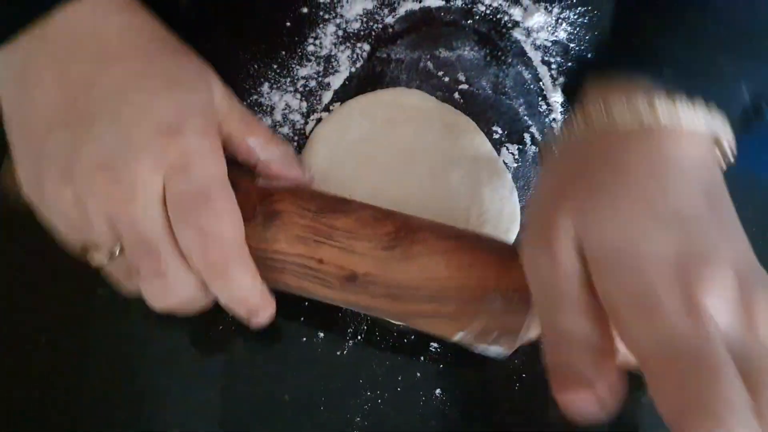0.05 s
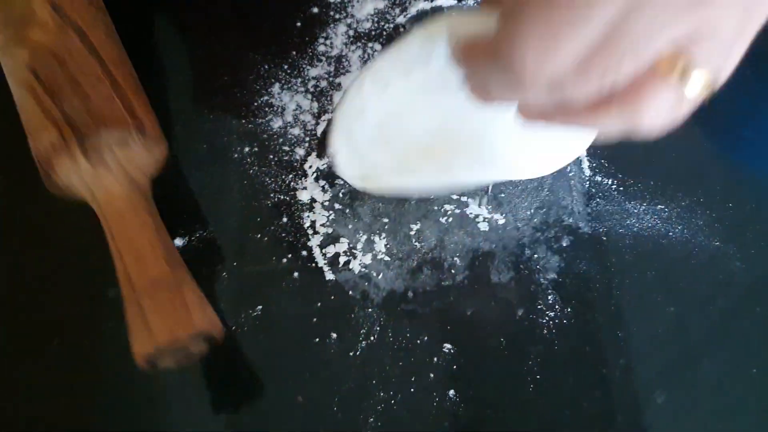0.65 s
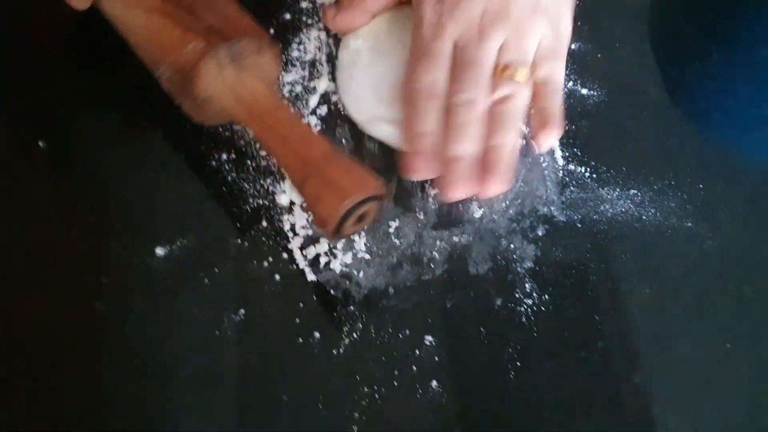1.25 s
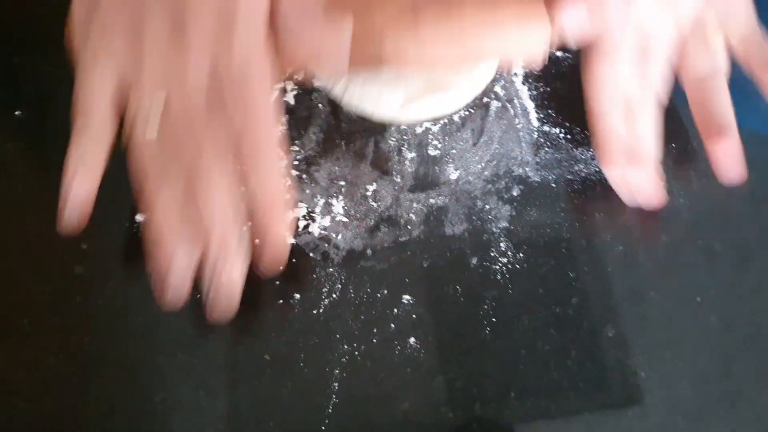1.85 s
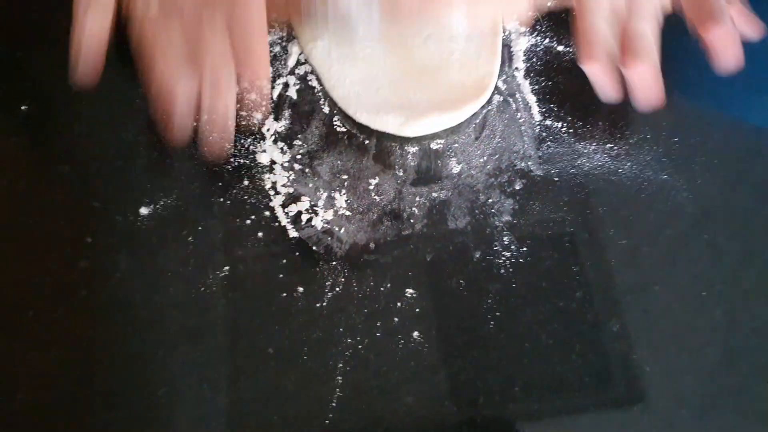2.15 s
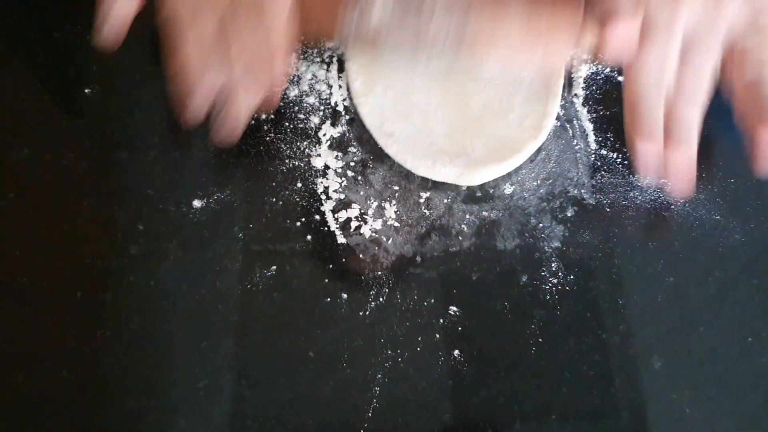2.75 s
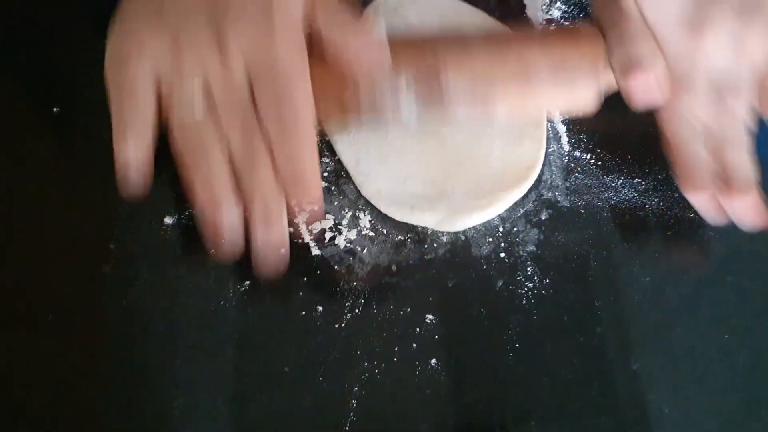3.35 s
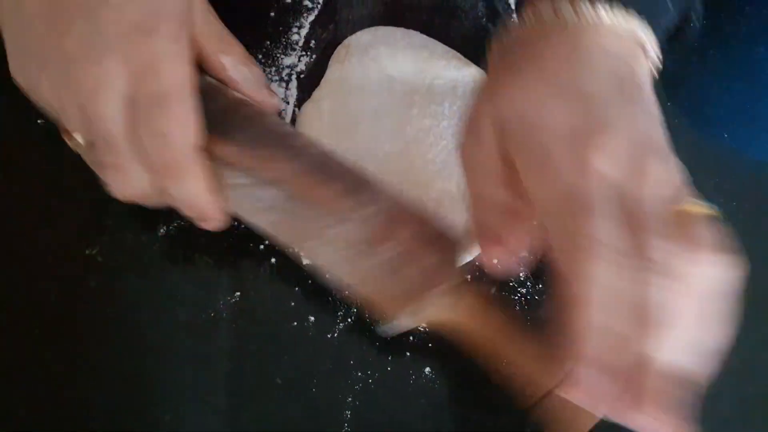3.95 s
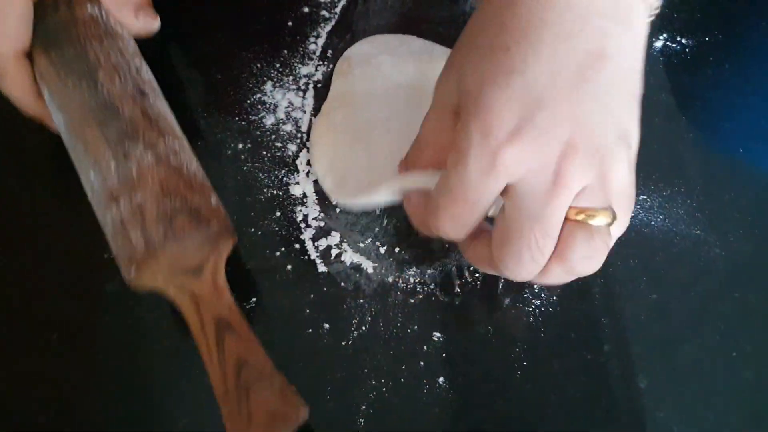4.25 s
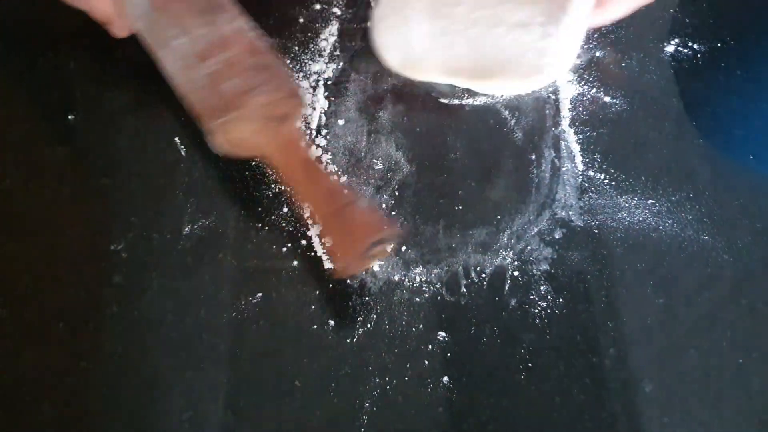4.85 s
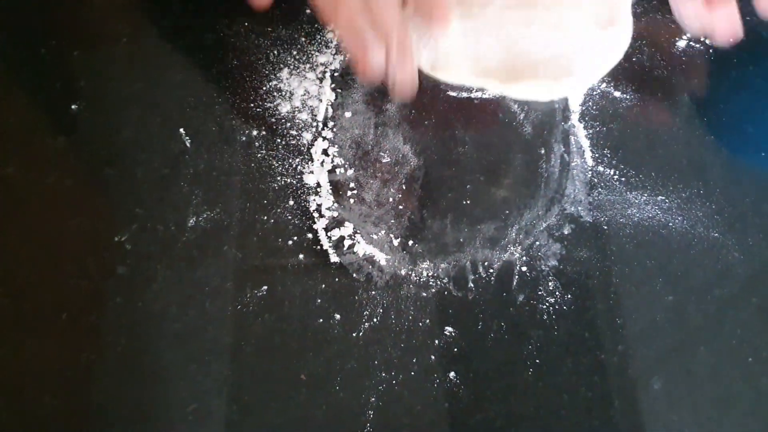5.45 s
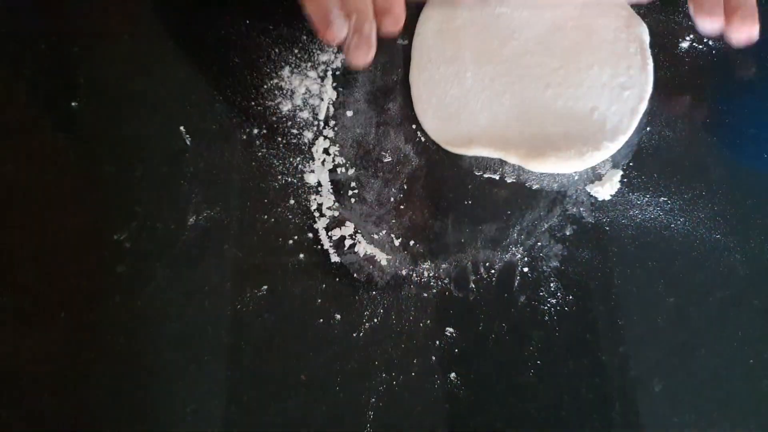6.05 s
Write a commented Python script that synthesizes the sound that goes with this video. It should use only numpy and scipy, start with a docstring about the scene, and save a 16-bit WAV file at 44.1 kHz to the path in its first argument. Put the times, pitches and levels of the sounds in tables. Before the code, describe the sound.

Dough is rolled and flipped on a stone counter, with floury swishes, wooden clacks and dull thumps in a humming kitchen.

```python
"""A wooden pin rolls out dough on a floured stone countertop, heard close up in a humming kitchen.
Flour grains shear and hiss under palms and pin, and the wood gives each pass a hollow colour.
The pin knocks and skids, jewellery clicks, fingertips pat, and soft pushes make the counter thump.
Twice the dough tears loose from the stone and flaps over; once it lands with a slap."""
import sys
import numpy as np
from scipy import signal
from scipy.fft import rfft, irfft, next_fast_len
from scipy.io import wavfile
from scipy.ndimage import uniform_filter1d, map_coordinates

SR = 44100
rng = np.random.default_rng(int(sys.argv[2]) if len(sys.argv) > 2 else 0)


def transcribe(signal):
    """Save signal, clipped to [-1, 1], as a 16-bit WAV file at the path in sys.argv[1]."""
    frames = np.atleast_2d(signal).T
    limited = np.clip(frames, -1, 1)
    pcm = np.round(limited * 32767).astype(np.int16)
    wavfile.write(sys.argv[1], SR, pcm)


N = 273861
TIME = np.arange(N) / SR
AFTER = TIME[:SR]  # seconds since a blow

# Mains and motor hum. Each row: pitch in Hz, relative level in dB.
HUM_TONES = [(24.7, -57), (40.4, -45.5), (52, -50), (71.5, -43.5), (100.05, -33.5), (200.1, -52),
             (221.4, -49), (242.6, -52)]
# The kitchen's reverb. Each row: frequency in Hz, time to fall 60 dB in seconds.
ROOM_DECAY = [(150, 0.16), (1300, 0.58), (5000, 0.39), (14000, 0.075)]
# Stereo width of the noises. Each row: frequency in Hz, left-right likeness from 0 to 1.
STEREO_LIKENESS = [(100, 0.99), (250, 0.86), (500, 0.65), (1000, 0.25), (2000, 0), (12000, 0)]
# Tone of the microphone ports. Each row: frequency in Hz, right side over left in dB.
PORT_BALANCE = [(100, -1.64), (300, -2.5), (1100, -3), (2000, -1.5), (3200, -1), (4800, -1), (6500, -1),
                (8000, -0.5), (9300, 14.5), (11000, 2), (13000, 4.5), (15500, -5)]

# Noise colours. Each row: frequency in Hz, relative spectral level in dB.
AIR_TONE = [(15, -31), (45, 3), (100, -0.5), (150, -6.5), (200, -5.5), (300, -12), (500, -23), (900, -31.5),
            (2000, -47), (4000, -45.5), (7000, -73.5), (15000, -95)]  # dull room air
MIC_TONE = [(500, 6), (1200, -5), (2500, 4), (4200, -5), (7000, -5.5), (10000, -3.5), (12000, -8),
            (15500, -13)]  # steady microphone hiss
CRACK_TONE = [(300, -16), (1200, -3), (2600, -11.5), (4500, -1.5), (10000, -1), (15500, -9)]  # metal on a hard surface
PAT_TONE = [(200, -18), (400, 5), (650, 8), (900, -26), (2000, -49), (5000, -60)]  # fingertip on dough
SMACK_TONE = [(200, 11), (600, -3.5), (850, -0.5), (1080, 8), (1350, -7.5), (1600, 0.5), (2400, -18),
              (4000, -16.5), (12000, -13.5)]  # flat impact of a slap
PUFF_TONE = [(500, -1.5), (2200, -7), (3600, 2), (5500, -10), (8000, -14.5), (10000, -8), (13000, -14),
             (15500, -25)]  # escaping air and flour
FLAP_TONE = [(25, 9), (43, 3.5), (72, 7), (95, 8.5), (125, 1), (165, -2.5), (190, 8), (250, -9), (330, -9),
             (500, -42), (1000, -58)]  # swinging dough
TEAR_TONE = [(150, -7.5), (320, 5.5), (400, -6), (450, 5), (520, -11), (660, -2.5), (900, -15),
             (1500, -20.5), (1900, -29.5), (2800, -31), (5000, -48.5)]  # dough leaving the stone
SKID_TONE = [(1200, -36), (2000, -3), (2350, -2.5), (2900, -7), (4000, -12), (7000, -18), (12000, -25)]  # slipping wood
FLOUR_TONE = [(2500, -39), (5000, -3.5), (7000, -4), (9500, 0), (12000, -1.5), (15500, -9)]  # shearing grains
SKIN_TONE = [(500, 1.5), (1500, -16), (2600, -5.5), (3300, -4), (4200, 0.5), (5200, -6), (6400, -3),
             (8000, -17), (12000, -35)]  # rasping palms
WOOD_TONE = [(250, -27), (600, 4.5), (850, -2.5), (1220, 4), (1550, -2), (1800, 2.5), (2080, 0),
             (2500, -16.5), (3250, -12.5), (3600, -29), (4250, -2.5), (4800, -36.5), (7000, -41)]  # hollow body of the pin

# Resonances. Each row: pitch in Hz, relative level in dB, nominal time to fall 60 dB in seconds.
COUNTER_MODES = [(57.5, -2, 0.35), (70.5, 2, 0.44), (124.5, -4.5, 0.23), (155, 7.5, 0.051),
                 (182.8, -5.5, 0.27), (330, -18.5, 0.29), (382.5, -12, 0.33)]  # counter and cabinet
PIN_MODES = [(740, -11, 0.012), (1000, -1.5, 0.0096), (1113, -7, 0.013), (1265, 4, 0.018), (1423, 1, 0.019),
             (1530, -14.5, 0.022), (1634, -1, 0.013), (1796, -6.5, 0.022), (2130, -7, 0.015),
             (4460, -24, 0.036)]  # rolling pin

# Dough, hands and pin come down on the counter.
# Each row: start in seconds, relative level in dB, push length in seconds, ring-time multiplier.
COUNTER_THUMPS = [(0.696, -17.5, 0.0021, 0.2), (0.751, -24.5, 0.0056, 0.93), (1.637, -17.5, 0.0085, 1.71),
                  (2.553, -24, 0.00073, .35), (4.812, -35, 0.0041, 0.91), (5.345, -18, 0.011, 1.2)]
# Ring and bracelet. Each row: start in seconds, relative level in dB, brightness in dB per octave.
JEWELLERY_CLICKS = [(0.168, -51, -3.5), (2.5006, -23, -3), (2.542, -34.5, -4), (3.122, -34.5, 7),
                    (3.127, -45, 3), (3.398, -38, 0), (4.052, -49, -3.5), (4.194, -50, -4.5)]
# Fingertips pat and grab the dough. Each row: start in seconds, relative level in dB.
FINGER_PATS = [(0.531, -43), (0.699, -53), (1.68, -36.5), (2.553, -39), (4.023, -46), (4.056, -45.5),
               (4.288, -38)]
# Soft, floury slaps. Each row: start in seconds, then relative levels of smack and puff in dB.
SOFT_SLAPS = [(1.631, -34.5, -51.5), (4.81, -30.5, -36), (5.337, -34, -49.5)]
# The dough is tugged off the stone and swung over.
# Each row: start and length of the hold in seconds, then relative levels of flap and tear in dB.
DOUGH_TUGS = [(0.537, 0.03, -43, -45), (0.701, 0.017, -32.5, -41.5), (0.731, 0.041, -29, -37),
              (0.812, 0.03, -34, -48.5), (0.904, 0.072, -44.5, -56), (4.042, .02, -53, -63),
              (4.205, 0.076, -36, -51.5), (4.294, 0.062, -44, -42), (4.39, 0.067, -64, -54.5)]
# The pin skids as it lifts off: start and length of the hold in seconds, then level in dB.
PIN_SKID = (3.908, 0.0073, -46.5)
# The pin hits the stone.
# Each row: start in seconds, relative level in dB, ring in dB (lower when hands damp the wood).
PIN_KNOCKS = [(2.168, -15, 0.5), (2.192, -33, -8), (2.774, -29, -7), (2.802, -28.5, -15), (3.39, -21, 0),
              (3.398, -22.5, -4), (5.938, -24, -11), (6.0076, -22.5, -8)]
# A hand or the dough brushes over the flour.
# Each row: start and length of the hold in seconds, then relative levels of hiss and rasp in dB.
FLOUR_BRUSHES = [(.08, 0.099, -67, -66.5), (0.34, .08, -66.5, -69), (0.548, 0.057, -58.5, -60.5),
                 (0.854, 0.063, -52.5, -53), (1.161, 0.069, -51.5, -50.5), (1.288, 0.06, -55.5, -50),
                 (1.602, .01, -61, -73), (4.108, 0.012, -56, -69), (4.172, 0.03, -66, -66),
                 (4.385, .055, -63, -75), (4.482, 0.0063, -62.5, -59), (4.735, 0.021, -66, -88),
                 (4.94, 0.016, -60.5, -61), (5.244, 0.048, -68.5, -90)]
# The pin rolls out or back. Each row: start and length of the hold in seconds, relative levels
# of flour hiss, palm rasp and hollow wood in dB, then the swell along the pass in dB.
PIN_PASSES = [(0.0, 0.0082, -57.5, -53.5, -56.5, 2.5), (1.702, 0.21, -52.5, -54, -56.5, 1.5),
              (2.142, 0.093, -51.5, -52, -55, 2.5), (2.333, 0.19, -53, -51, -52, 3),
              (2.716, 0.034, -56, -62, -65, -6), (2.794, 0.035, -48, -49, -60, 0),
              (2.932, .17, -53.5, -54, -55.5, 4), (3.322, 0.091, -52, -54, -57.5, 7.5),
              (3.491, 0.21, -55, -53, -53.5, -1), (3.738, 0.16, -59, -57.5, -62, 0),
              (5.373, 0.13, -56, -62, -53.5, -1.5), (5.499, 0.21, -51.5, -51, -54, -3),
              (5.915, 0.095, -51, -53, -55.5, 8), (6.161, 0.058, -50.5, -54, -54, 0)]


def amp(db):
    """Decibels to gain."""
    return 10 ** (np.asarray(db) / 20)


def unit(x):
    """Scale to rms 1."""
    return x / np.sqrt(np.mean(x ** 2) + 1e-20)


def along(points, hz):
    """Read (Hz, value) points on a log axis."""
    freqs, values = np.transpose(points)
    return np.interp(np.log(hz + 1), np.log(freqs + 1), values)


def wobble(rate):
    """A smooth random curve, rate knots a second."""
    return map_coordinates(rng.standard_normal(int(N * rate / SR) + 4), [TIME * rate])


def filtered(x, response):
    """Equalise x with a gain given as a function of Hz."""
    size = next_fast_len(x.shape[-1] + 8192)
    gain = response(np.fft.rfftfreq(size, 1 / SR))
    return irfft(rfft(x, size) * gain, size)[..., :x.shape[-1]]


def noise(tone, grain_db=0, size=N):
    """Coloured stereo noise of rms 1; grain_db makes it gritty by varying its tiny impulses."""
    def mid_side_gains(hz):
        width = np.arccos(np.clip(along(STEREO_LIKENESS, hz), -1, 1)) / 2
        return amp(along(tone, hz)) * [np.cos(width), np.sin(width)]
    impulses = rng.standard_normal((2, size)) * amp(grain_db * rng.standard_normal(size))
    mid, side = filtered(impulses, mid_side_gains)
    return unit(np.array([mid + side, mid - side]))


def drift(x, depth_db):
    """Moving hands shade and mirror the sound, so soft peaks and dips wander through its spectrum."""
    spectra = signal.stft(x, nperseg=256)[2]
    shading = rng.standard_normal(spectra.shape)
    for _ in range(2):
        shading = uniform_filter1d(shading, size=3, axis=1)  # across frequency
        shading = uniform_filter1d(shading, size=70, axis=2)  # across time
    shaded = spectra * amp(depth_db * unit(shading))
    return unit(signal.istft(shaded, nperseg=256)[1][:, :N])


def fade(t60, attack):
    """Envelope of a blow: quick rise, exponential fall, both set in seconds."""
    return np.exp(-np.log(1000) * AFTER / t60) * (1 - np.exp(-AFTER / attack))


def gesture(start, length, rise_db_per_s, fall_db_per_s, swell_db=0):
    """Envelope of a movement: it rises until start, holds or swells for its length, then dies away."""
    early, late = np.maximum(start - TIME, 0), np.maximum(TIME - start - length, 0)
    progress = np.clip((TIME - start) / length, 0, 1)
    return amp(swell_db * (progress - .5) - rise_db_per_s * early - fall_db_per_s * late)


def add(track, start, sound):
    """Mix a one-second sound into the track at start seconds."""
    first = round(start * SR)
    track[:, first:first + SR] += sound[..., :N - first]


def kitchen_reverb(x, near_db, tail_db):
    """The backsplash and cupboards answer within a few hundredths of a second, the room later."""
    size, predelay = SR // 2, round(.008 * SR)
    hz, seconds, spectra = signal.stft(rng.standard_normal((2, size)), SR, nperseg=256)
    decay = np.exp(-np.log(1000) * seconds / along(ROOM_DECAY, hz)[:, None])
    tail = signal.istft(spectra * decay, SR, nperseg=256)[1][:, :size]
    near = rng.standard_normal(tail.shape) * fade(t60=.035, attack=.0005)[:size]
    echoes = amp(near_db) * near / np.linalg.norm(near[0])
    echoes += amp(tail_db) * tail / np.linalg.norm(tail[0])
    delayed = np.pad(x, ((0, 0), (predelay, 0)))
    return x + signal.fftconvolve(delayed, echoes, axes=1)[:, :SR]


def room_tone():
    """An appliance drones over the dull air of the room and a faint microphone hiss."""
    hum = np.zeros(N)
    for hz, db in HUM_TONES:
        gain = amp(db + 2 + 0.9 * wobble(2.85))
        phase = 2 * np.pi * (hz * TIME + rng.random()) + 0.22 * wobble(2.01)
        hum += gain * np.sin(phase)
    return hum + amp(-41) * noise(AIR_TONE) + amp(-68.5) * noise(MIC_TONE)


def counter_thumps():
    """A soft push sways the counter: longer pushes sound duller, and weight left on it damps it."""
    out = np.zeros((2, N))
    for start, db, push, ring_scale in COUNTER_THUMPS:
        for hz, mode_db, t60 in COUNTER_MODES:
            strength = amp(db + mode_db + 2) / (1 + (hz * push / 2) ** 2)
            envelope = fade(t60 * ring_scale, attack=0.86 / hz)
            add(out, start, strength * envelope * np.sin(2 * np.pi * hz * AFTER))
    return out


def jewellery_clicks():
    """Metal on a hard surface: a crack of a few milliseconds, brighter for a lighter piece."""
    out = np.zeros((2, N))
    for start, db, brightness in JEWELLERY_CLICKS:
        tone = [(hz, level + brightness * np.log2(hz)) for hz, level in CRACK_TONE]
        crack = amp(db + 2.5) * fade(t60=0.017, attack=0.000067) * noise(tone, size=SR)
        add(out, start, kitchen_reverb(crack, near_db=-16.5, tail_db=-27.5))
    return out


def finger_pats():
    """A fingertip on soft dough: one short, dull pop."""
    out = np.zeros((2, N))
    for start, db in FINGER_PATS:
        add(out, start, amp(db) * fade(t60=0.08, attack=.0015) * noise(PAT_TONE, size=SR))
    return out


def soft_slaps():
    """A flat smack, then air and flour rush out from underneath."""
    out = np.zeros((2, N))
    for start, smack_db, puff_db in SOFT_SLAPS:
        smack = amp(smack_db + 8.5) * fade(t60=0.04, attack=0.0017) * noise(SMACK_TONE, size=SR)
        puff = amp(puff_db) * fade(t60=0.38, attack=0.0012) * noise(PUFF_TONE, size=SR)
        add(out, start, kitchen_reverb(smack + puff, near_db=-10, tail_db=-9.5))
    return out


def dough_turns():
    """The dough tears loose from the stone in little jerks and flaps as it is turned."""
    power = np.zeros((2, N))
    for start, length, flap_db, tear_db in DOUGH_TUGS:
        # It gives way quickly and sags slowly.
        envelope = gesture(start, length, rise_db_per_s=700, fall_db_per_s=229)
        power += np.outer(amp([flap_db, tear_db]), envelope) ** 2
    flap_gain, tear_gain = np.sqrt(power)
    jerks = amp(0.78 * wobble(80))
    flap = amp(6.5) * flap_gain * noise(FLAP_TONE)
    tear = amp(2.5) * tear_gain * noise(TEAR_TONE, grain_db=3)
    return jerks * (flap + tear)


def pin_skid():
    """Wood slips sideways on the floured dough with a short, gritty scrape."""
    start, length, db = PIN_SKID
    envelope = gesture(start, length, rise_db_per_s=400, fall_db_per_s=330)
    return amp(db) * envelope * noise(SKID_TONE, grain_db=10)


def pin_knocks():
    """Wood on stone, a little to the left: a dry clack and a brief ring of close, beating modes."""
    out = np.zeros((2, N))
    for start, db, ring_db in PIN_KNOCKS:
        knock = amp(-10.5) * fade(t60=0.023, attack=0.0009) * noise(WOOD_TONE, size=SR)
        for k, (hz, mode_db, t60) in enumerate(PIN_MODES):
            strength = amp(mode_db + ring_db + rng.normal(0, 0.78, (2, 1)))
            phase = k * np.pi / 2 + rng.normal(0, 0.74, (2, 1))
            knock += strength * fade(t60, attack=0.00042) * np.sin(2 * np.pi * hz * AFTER + phase)
        knock *= amp(db) / np.abs(knock).max()
        add(out, start, kitchen_reverb(knock, near_db=-6, tail_db=-11.5))
    return out * amp([[1.2], [-1.2]])


def rolling_and_brushing():
    """Flour shears under palms and pin; the pressure flutters and the wood colours the rolling."""
    firm_db, sizzle_hz = -52.5, 11100  # level of a firm stroke; where the top of the hiss begins
    power = np.zeros((3, N))
    for start, length, hiss_db, rasp_db, wood_db, swell_db in PIN_PASSES:
        # The pin gathers speed, then runs out.
        envelope = gesture(start, length, rise_db_per_s=213, fall_db_per_s=158, swell_db=swell_db)
        power += np.outer(amp([hiss_db, rasp_db, wood_db]), envelope) ** 2
    for start, length, hiss_db, rasp_db in FLOUR_BRUSHES:
        body_db = -64.5 + 0.53 * (rasp_db - firm_db)  # a firmer brush brings out the hollow counter
        # A bare hand starts and stops sooner.
        envelope = gesture(start, length, rise_db_per_s=308, fall_db_per_s=183)
        power += np.outer(amp([hiss_db, rasp_db, body_db]), envelope) ** 2
    hiss_gain, rasp_gain, body_gain = np.sqrt(power)
    pressure = amp(1.06 * wobble(39) + 0.81 * wobble(160))
    grains = drift(noise(FLOUR_TONE, grain_db=1), depth_db=1.04)
    soft_hiss = filtered(grains, lambda hz: 1 / (1 + (hz / sizzle_hz) ** 10))
    sizzle = (hiss_gain / amp(firm_db)) ** 0.36 * (grains - soft_hiss)  # less for a lighter touch
    flour = amp(3) * hiss_gain * (soft_hiss + sizzle)
    skin = amp(3) * rasp_gain * drift(noise(SKIN_TONE, grain_db=3), depth_db=2.5)
    body_flutter = amp(2 + 1.5 * wobble(70))
    body = body_flutter * body_gain * drift(noise(WOOD_TONE, grain_db=5), depth_db=3.5)
    return pressure * (flour + skin + body)


def scene():
    """All the work on the counter, over a bed of hum and faint hiss."""
    bed = room_tone()
    hits = pin_knocks() + jewellery_clicks() + soft_slaps() + finger_pats() + counter_thumps()
    return bed + hits + rolling_and_brushing() + pin_skid() + dough_turns()


def record(dry):
    """The two microphone ports colour left and right differently; the very top is cut off."""
    top_hz = 15820
    def port_gains(hz):
        return amp(np.outer([-.5, .5], along(PORT_BALANCE, hz))) * (hz < top_hz)
    return filtered(dry, port_gains)


dry = scene()
out = record(dry)
transcribe(out)
```